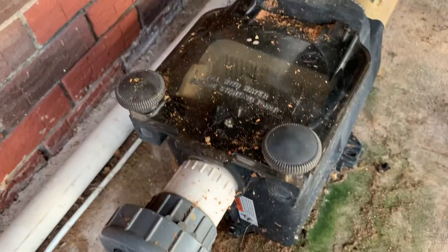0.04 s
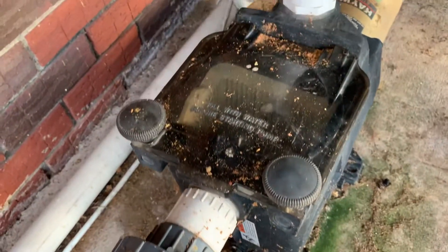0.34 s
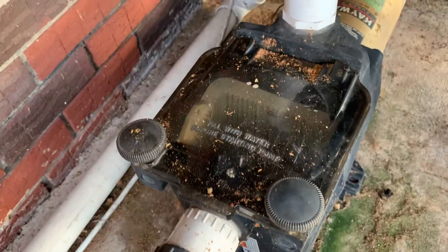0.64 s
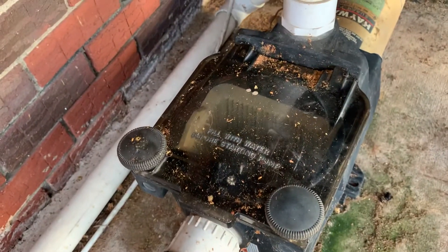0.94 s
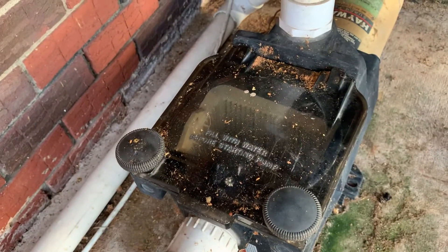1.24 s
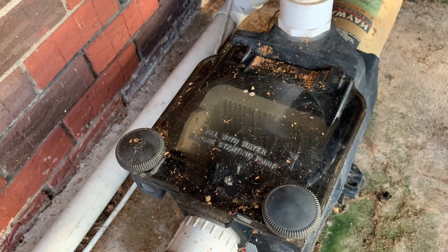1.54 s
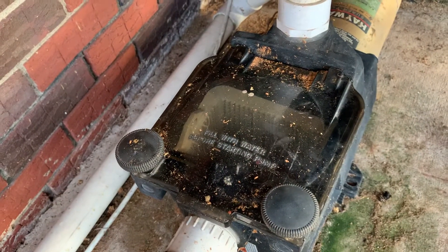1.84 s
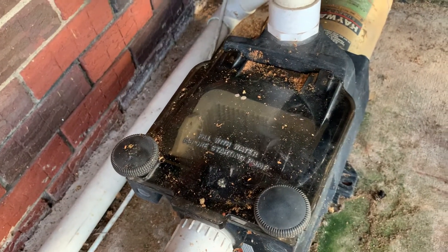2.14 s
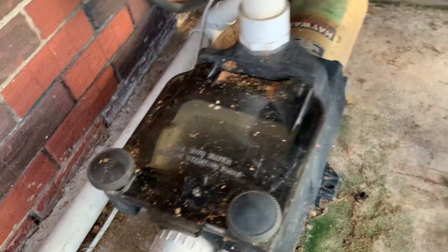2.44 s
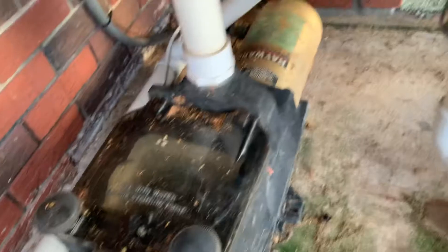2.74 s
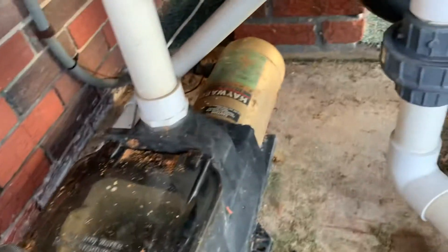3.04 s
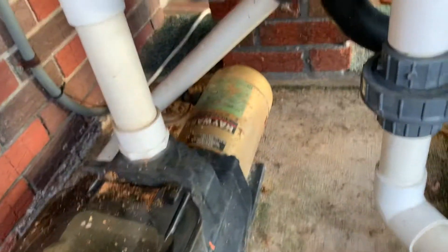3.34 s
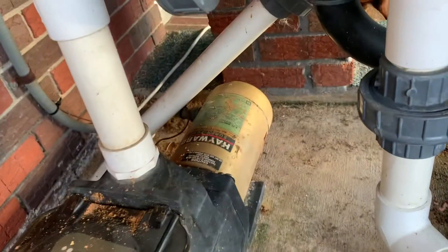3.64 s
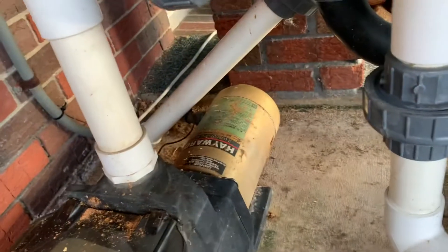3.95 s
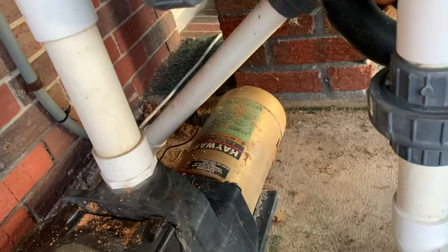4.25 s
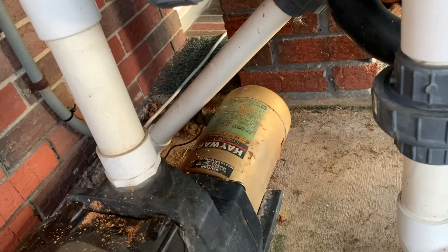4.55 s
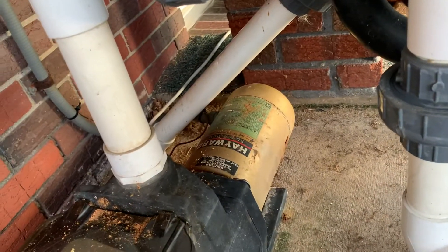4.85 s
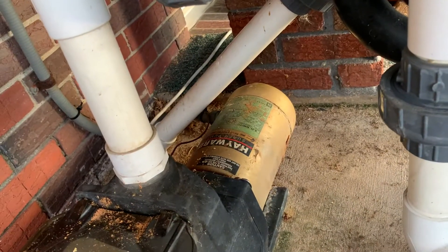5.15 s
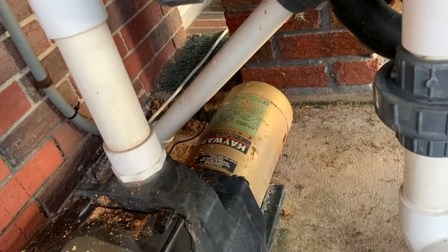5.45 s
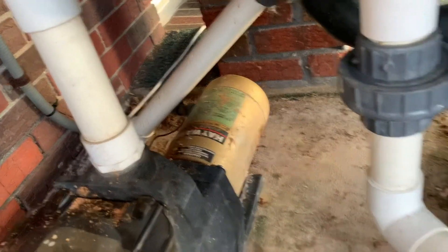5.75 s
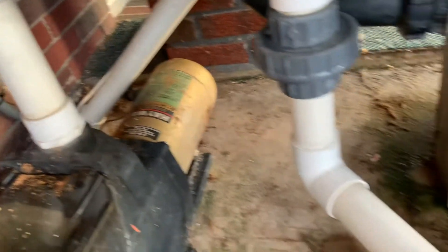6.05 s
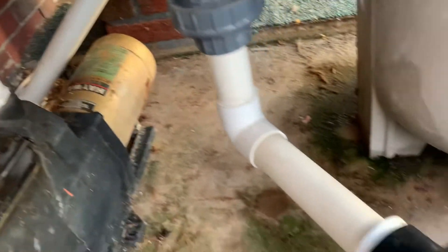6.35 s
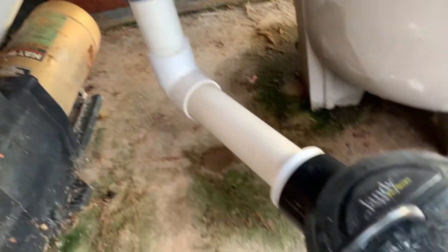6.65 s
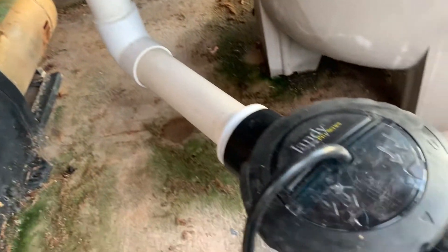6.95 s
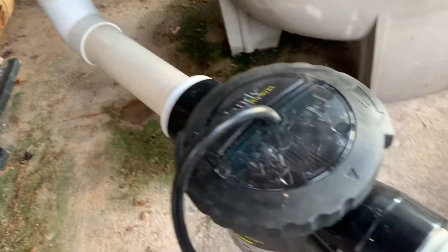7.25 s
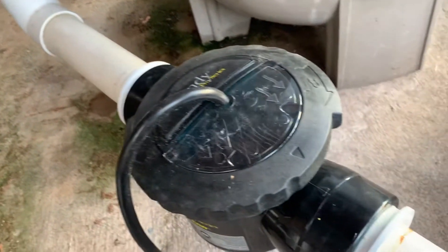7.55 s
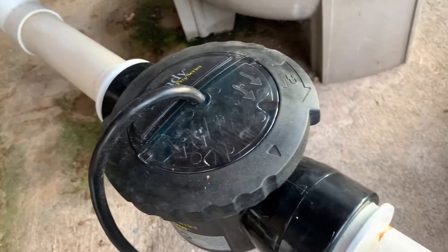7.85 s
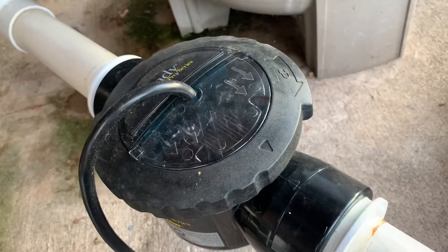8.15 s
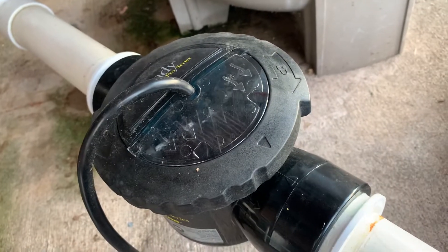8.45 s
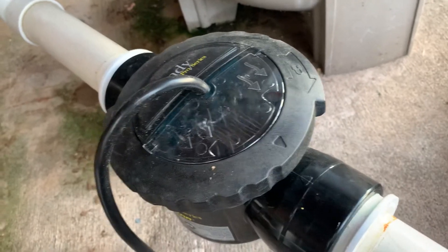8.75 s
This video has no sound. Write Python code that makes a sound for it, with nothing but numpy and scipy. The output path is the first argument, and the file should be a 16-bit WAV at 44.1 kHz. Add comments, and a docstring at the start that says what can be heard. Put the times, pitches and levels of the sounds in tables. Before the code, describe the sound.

A pool pump runs outdoors beside a brick wall for the whole nine seconds, heard from a close, moving microphone. Its worn bearing makes a loud whine: a rapidly fluttering mid-pitched drone with many higher whistling tones that slowly swell and fade. Under it lie a fine grinding rattle, a low electric hum pulsing about three times a second, a steady rush of cooling air and a high hiss of water in the pipes. From about 3.5 to 5.5 seconds, by the motor, the drone is strongest and the water hiss is a little brighter. Between 6 and 7 seconds the microphone moves on toward a valve, and the low hum and lower drone weaken. A higher, piercing tone then swells, peaking near 8 seconds, while rattle and hiss ease slightly. The pump is still running at the end.

```python
"""A worn ball bearing whines in a pool pump beside a brick wall.
A pitted ball knocks on the races, louder once per cage turn, giving harmonics with sidebands.
The microphone moves from strainer lid past motor to valve: the lowest sideband pair drones
throughout, higher tones swell and fade as it crosses their standing waves.
The bearing also rattles, mains hum beats against the shaft, cooling air and water rush."""
import sys
import numpy as np
from scipy import signal
from scipy.fft import rfft, irfft, next_fast_len
from scipy.io import wavfile

SR = 44100
rng = np.random.default_rng(int(sys.argv[2]) if len(sys.argv) > 2 else 0)


def log_audio(samples):
    """Write samples as a 16-bit WAV file to the path given in sys.argv[1]."""
    # one column per channel
    frames = np.atleast_2d(samples).T
    # limit to full scale, then quantise
    limited = np.clip(frames, -1, 1)
    pcm = np.round(limited * 32767).astype(np.int16)
    wavfile.write(sys.argv[1], SR, pcm)


N = 392490

BALL_HZ, CAGE_HZ, SHAFT_HZ, MAINS_HZ = 228.12, 23.15, 58.53, 60.0
CONTROL_STEP = 50
TIME_S = np.arange(N) / SR
CONTROL_S = np.arange(N // CONTROL_STEP + 2) * CONTROL_STEP / SR
FFT_SIZE = next_fast_len(N, True)
FREQS_HZ = np.maximum(np.arange(FFT_SIZE // 2 + 1) * SR / FFT_SIZE, 1)

# Microphone path: time_s, position_m
MIC_PATH = [(0, 0.062), (2.3, 0.034), (3.5, 0.337), (5.5, 0.24), (6.2, 0.616), (7.3, 0.88), (8.9, 0.9)]
# Relation of the two microphone ports: freq_hz, coherence, left_lead_rad
MIC_PORTS = [(100, 1, 0.8), (298, 0.82, -0.5), (520, 0.33, 1.47), (1260, 0.19, 0.5), (4970, 0.13, -1),
             (7160, 1, -3), (8540, 0.8, -5.5), (10340, 0.92, -7.5), (11380, 1, -10.5), (13760, 1, -12)]
# Source gains along the path: time_s, air_db, bearing_db, water_db
NEARNESS = [(0, -3.5, 1.5, 0), (2.4, -6, -0.5, 2), (3.5, -8.5, -0.6, 4), (5.3, -8, 0.8, 4),
            (6.2, -5, -2.8, 2.5), (6.9, -4, -1.2, 2), (8.9, -6, -4, -1)]
# Cooling air spectrum: freq_hz, density_db
AIR_SPECTRUM = [(25, -35), (45, -30), (62, 3), (90, -12), (150, -12), (270, 3), (350, -17), (450, 0.5),
                (580, -3), (700, -13.5), (900, -5), (1350, -14.5), (2200, -8.5), (5000, -28)]
# Water hiss spectrum: freq_hz, density_db
WATER_SPECTRUM = [(2000, -4), (5500, -3.5), (7000, -4), (8200, 1.5), (10500, 0.5), (11500, -2),
                  (12600, -6.5), (14000, -8.5), (15200, -22)]
# Motor hum along the path: time_s, magnetic_db, shaft_gain_db
HUM_LEVELS = [(0, -38.5, 2.5), (5.8, -38, 3), (7.1, -45.5, -2), (8.9, -45.5, -11)]
# Shaft and blade tones: shaft_order, level_db
SHAFT_ORDERS = [(2, -45), (5, -46)]
# Bearing rattle colour: freq_hz, gain_db
RATTLE_SPECTRUM = [(60, -57), (250, -3), (690, -4.5), (950, 1), (2000, 2.5), (2700, 1.5), (3200, -7),
                   (3800, -0.5), (4450, 0.5), (5000, -5.5), (6100, -1), (8200, -3.5), (10500, -7.5),
                   (13800, -21), (15000, -36)]
# Lower sideband of ball harmonic 2: time_s, level_db, left_over_right_db
LOWER_DRONE = [(0, -24, -4), (1.9, -23, -2.3), (2.8, -27, -5.5), (4, -20.5, -12), (5.5, -21.0, -10.5),
               (6.8, -26.5, -0.5), (8.9, -32.5, -3)]
# Upper sideband of ball harmonic 2: time_s, level_db, left_over_right_db
UPPER_DRONE = [(0, -31, 1), (2.6, -45.5, -5), (3.8, -31.5, -3), (5.7, -33, -10), (6.6, -23.5, -0.5),
               (8.1, -32, 8), (8.9, -29.5, 1)]
# Tones that carry outside any loud lobe: ball_harmonic, cage_sideband, base_db
CARRYING_TONES = [(2, 0, -48.5), (3, -1, -50), (3, 0, -57), (5, 0, -47.5), (6, 1, -43), (11, 1, -49),
                  (12, -1, -46.5), (15, -1, -48.5), (15, 0, -49), (19, 0, -47)]
# Loud standing-wave lobes, crossed node to node: # middle_s, length_s, ball_harmonic, cage_sideband (steps of
# the cage rate), peak_db, left_over_right_db, left_lead_rad # The two 6.42 s rows, 5 steps above harmonics 17
# and 18, stand for the shaft's second-order sidebands near 4 kHz.
LOBES = [(3.99, 3.32, 3, 0, -29, 3.5, 1.3), (6.74, 3.35, 3, 0, -29, 3.5, 1.88),
         (8.83, 1.3, 3, 0, -32.5, 6, 2.5), (7.1, 3.4, 3, 1, -41, 3, 2.5), (7.6, 5.1, 4, 0, -42, 7, 0.75),
         (1.86, 4, 5, -1, -36, 1, -1), (3.17, 2.06, 5, -1, -38, 2, -1.5), (7.9, 2.9, 5, -1, -36, 0.5, 2),
         (5.38, 2.3, 5, 1, -37.5, 6, 0.6), (8.5, 2.7, 5, 1, -39.5, 9, 2.5),
         (3.48, 1.3, 6, -2, -38, -2, 0.6), (0.79, 3, 6, -1, -31, -0.5, 3),
         (2.43, 1.15, 6, -1, -28.5, 4.5, 3), (3.52, 1.05, 6, -1, -27.5, -0.5, 0.3),
         (4.97, 2.15, 6, -1, -24.5, -0.5, 3.5), (5.82, 0.63, 6, -1, -33, -3, 4.6),
         (6.73, 1.25, 6, -1, -29.5, 2.5, 4), (7.82, 2.73, 6, -1, -19, -2, 3.5),
         (0.071, 3.54, 6, 1, -24, 4.5, 0), (2.12, 2.23, 6, 1, -30.5, 1, 0.8), (3.32, .7, 6, 1, -34, 0, 1.5),
         (5.88, 0.63, 6, 1, -35.5, -1, -1.5), (7.1, 1.5, 6, 1, -31.5, 2, 0.2),
         (8.16, 0.99, 6, 1, -38, -1, 1.8), (8.85, 0.48, 6, 1, -31.5, 3, 2), (0.4, 1.5, 7, -1, -37, 0, -2),
         (1.6, 2.5, 7, 1, -33.5, -4, -1.2), (3.85, 3.2, 7, 1, -36.5, 0.5, 0.8),
         (6.52, 0.92, 7, 1, -36, 0, 0.8), (3.93, 2.4, 9, -1, -40, 6, .5), (6.8, 0.85, 9, -1, -40.5, 3, 1),
         (7.36, 0.93, 9, 1, -39.5, 0, 0), (4.1, 0.78, 10, 1, -40, 4, 0.2), (5.24, 1.4, 10, 1, -38, 2, 0.2),
         (2.47, 1.43, 12, -1, -37, 3, 0.5), (4.36, 1.9, 12, -1, -35.5, -1, -2.5),
         (5.58, 1.4, 12, -1, -33, -1.5, -1.7), (8.07, 3.2, 12, -1, -42.5, 5, 0.5),
         (3.3, 1.5, 12, 1, -35, -1, 1.44), (6.49, 0.82, 12, 1, -32, 6, -1.5), (3.5, 2.4, 13, 1, -39, -3, 3),
         (6.05, 2.2, 13, 1, -38, 1, 3), (8.01, 3, 13, 1, -38, 3, 1.75), (3.83, 1.7, 15, 0, -39.5, -1, 2),
         (5.23, 1.4, 15, 0, -37, -4, 4), (0.65, 1.5, 16, 0, -38.5, 5, -3),
         (3.75, 1.7, 16, 0, -34.5, -3, 1.8), (5.16, 1.65, 16, 0, -34.5, -4.5, 0.7),
         (5.9, 0.38, 16, 0, -38, -3, 1.5), (6.27, 0.38, 16, 0, -36, -3, 2.5),
         (6.83, 0.74, 16, 0, -33, 2, -2), (8.12, 1.06, 16, 0, -38, 2, 1), (1.1, 1.1, 17, -1, -43, -1, 0),
         (7.95, 0.84, 17, -0.5, -42.5, -1, 0.5), (0.25, 1.2, 17, 0, -36.5, -1, 0.5),
         (1.14, 0.81, 17, 0, -39, -2, 0), (2.03, 0.83, 17, 0, -37.5, -2, 0.5),
         (3.25, 1.1, 17, 0, -34, -4, -2.3), (4.3, 1.9, 17, 0, -40, -2, 3),
         (6.24, 0.4, 17, 0, -32.5, 1, 0.5), (7.02, 1.4, 17, 0, -34, -0.5, -1.6),
         (8.88, 0.7, 17, 0, -35.5, -2, -2), (0.091, 0.76, 17, 1, -35.5, -4, 0.5),
         (5, 1.4, 17, 1, -43, -2, 0.5), (6.42, 0.36, 17, 5, -39, 0, -0.5), (6.42, 0.39, 18, 5, -41, -2, 2),
         (6.3, 0.45, 18, 0, -37, -1, 2.5), (1.36, 1.2, 19, -1, -43.5, 1, -0.5),
         (0.87, 0.78, 19, 0, -38.5, -2, 1.4), (3.27, 0.98, 19, 0, -41, -3, 0.5),
         (4.26, 0.9, 19, 0, -42, -2, 0), (8.2, 1.4, 19, 0, -41, -3, 0),
         (0.38, 0.48, 20, 0, -38.5, -8, -0.2), (4.3, 1.3, 20, 0, -40.5, -5, 0.7),
         (7.3, 1, 20, 0, -42, -5, 1.3), (8.7, 0.6, 20, 0, -40.5, -4, 1.2),
         (4.94, 2.4, 21, 0, -41.5, -11, 0.5), (2.07, 1.1, 25, 1, -40, -13, -2.5),
         (4.2, 1, 35, -1.5, -39, 0, 1)]


def from_db(db):
    return 10 ** (np.asarray(db) / 20)


def unit_rms(x):
    return x / np.sqrt(np.mean(np.abs(x) ** 2) + 1e-20)


def over_time(rows, times_s):
    """Table columns, interpolated in time."""
    knots_s, *columns = np.transpose(rows)
    return [np.interp(times_s, knots_s, column) for column in columns]


def over_freq(rows):
    """Table columns, interpolated in log frequency."""
    knots_hz, *columns = np.transpose(rows)
    return [np.interp(np.log(FREQS_HZ), np.log(knots_hz), column) for column in columns]


def drift(rate_hz):
    """Low-passed noise at control rate; rms 1."""
    pole = np.exp(-2 * np.pi * rate_hz * CONTROL_STEP / SR)
    count = len(CONTROL_S)
    noise = rng.standard_normal(2 * count)
    return unit_rms(signal.lfilter([1], [1, -2 * pole, pole * pole], noise)[count:])


def phasor(hz, start_s=0):
    """Steady rotation at control rate."""
    return np.exp(2j * np.pi * hz * (CONTROL_S - start_s))


def audio_rate(control):
    return np.interp(TIME_S, CONTROL_S, control)


def tone_at_ports(level_db, pan_db, lead_rad):
    """Complex amplitude of a tone at the left and right port."""
    ratio = from_db(pan_db)
    right = np.sqrt(2 / (1 + ratio ** 2))
    ports = [ratio * right * np.exp(.5j * lead_rad), right * np.exp(-.5j * lead_rad)]
    return from_db(level_db) * np.vstack(ports)


def noise_at_ports(pair, spectrum):
    """Two signals, coloured and mixed as the ports pick them up; rms 1."""
    coherence, lead_rad = over_freq(MIC_PORTS)
    coherence = np.clip(coherence, 0, 1)
    left, other = rfft(pair, FFT_SIZE)
    right = (coherence * left + np.sqrt(1 - coherence ** 2) * other) * np.exp(-1j * lead_rad)
    colour = from_db(over_freq(spectrum)[0])
    return unit_rms(irfft(np.array([left, right]) * colour, FFT_SIZE)[:, :N])


def housing_ring(pair, position_m, t60_s, direct_db, zones):
    """Housing, wall and slab ring briefly; peaks and notches change with position."""
    age_s = TIME_S[:SR // 20]
    place = audio_rate(position_m)
    place = place / place.max() * (zones - 1)
    out = from_db(direct_db) * pair
    for zone in range(zones):
        ring = rng.standard_normal((2, len(age_s))) * from_db(-60 * age_s / t60_s)
        ring /= np.linalg.norm(ring, axis=1, keepdims=True)
        share = np.sqrt(np.maximum(1 - np.abs(place - zone), 0))
        out += signal.oaconvolve(pair * share, ring, axes=1)[:, :N]
    return out


def cooling_air():
    """Broadband rush of the motor's cooling air; rms 1."""
    return noise_at_ports(rng.standard_normal((2, N)), AIR_SPECTRUM)


def water_hiss(position_m):
    """Water squeezes through impeller and pipes, heard through the ringing housing; rms 1."""
    flow = rng.standard_normal((2, N))
    ringing = housing_ring(flow, position_m, t60_s=0.051, direct_db=1.0, zones=6)
    return noise_at_ports(ringing, WATER_SPECTRUM)


def motor_hum(in_phase_s=0.294, overtone_db=-50.5, unbalance_db=-49):
    """The rotor slips behind the field, so shaft order 2 beats with the hum at about 3 Hz."""
    magnetic_db, shaft_gain_db = over_time(HUM_LEVELS, TIME_S)
    rad_per_hz = 2 * np.pi * (TIME_S - in_phase_s)
    magnetic = from_db(magnetic_db) * np.cos(2 * MAINS_HZ * rad_per_hz)
    magnetic += from_db(overtone_db) * np.cos(4 * MAINS_HZ * rad_per_hz)
    shaft = sum(from_db(db) * np.cos(order * SHAFT_HZ * rad_per_hz) for order, db in SHAFT_ORDERS)
    unbalance = from_db(unbalance_db) * np.cos(SHAFT_HZ * rad_per_hz)
    balance = from_db([[-0.7], [0.7]])
    return np.sqrt(2) * (magnetic + unbalance + from_db(shaft_gain_db) * shaft) * balance


def race_roughness(skid_s, points=700):
    """The same race bumps pass on every shaft turn: a fine comb of lines; rms 1."""
    turn = SHAFT_HZ * (TIME_S + skid_s) % 1
    return unit_rms(np.interp(turn, np.linspace(0, 1, points), rng.standard_normal(points)))


def ball_knocks(skid_s, cage_depth=0.4, shaft_depth=0.38, spread_db=1.0):
    """Impulses of the pitted ball, loaded by cage and shaft; rms 1."""
    turns = BALL_HZ * (TIME_S + skid_s)
    hits = np.flatnonzero(np.diff(np.floor(turns)) > 0)
    late_samples = (np.ceil(turns[hits]) - turns[hits]) * SR / BALL_HZ
    cage_load = 1 + cage_depth * np.cos(2 * np.pi * CAGE_HZ * TIME_S[hits])
    shaft_load = 1 + shaft_depth * np.cos(2 * np.pi * SHAFT_HZ * TIME_S[hits])
    force = cage_load * shaft_load * from_db(-spread_db * rng.standard_normal(len(hits)))
    knocks = np.zeros(N)
    knocks[hits], knocks[hits + 1] = force * (1 - late_samples), force * late_samples
    return unit_rms(knocks)


def bearing_rattle(skid_s, position_m, race_db=2.5, grind_db=6.5):
    """Knocks, race bumps and grinding ring the housing."""
    knocks = ball_knocks(skid_s)
    bumps = from_db(race_db) * race_roughness(skid_s)
    grind = from_db(grind_db) * rng.standard_normal((2, N))
    ringing = housing_ring(knocks + bumps + grind, position_m, t60_s=0.031, direct_db=-6.0, zones=12)
    balance = from_db([[-0.8], [0.8]])
    return balance * noise_at_ports(ringing, RATTLE_SPECTRUM)


def standing_wave(hz, position_m, direct=0.25, port_gap_m=0.1335, count=6, sound_m_per_s=343):
    """Direct sound plus reflections off wall, slab and pipes, summed by position; rms 1."""
    along, across, half_turns = rng.uniform(-1.004, 1, (3, count, 1, 1))
    path_m = along * position_m + across * port_gap_m * np.array([[0], [1]])
    rays = np.exp(1j * (2 * np.pi * hz * path_m / sound_m_per_s + np.pi * half_turns))
    return unit_rms(direct + rays.sum(0) / np.sqrt(count))


def swells(harmonic, sideband):
    """One tone's half-cosine lobes, and how deep the microphone is inside one (0-1)."""
    envelope, inside = 0, 0
    for middle_s, length_s, lobe_harmonic, lobe_sideband, peak_db, pan_db, lead_rad in LOBES:
        if (round(lobe_harmonic), round(lobe_sideband)) == (harmonic, sideband):
            lobe = np.cos(np.pi * np.clip((CONTROL_S - middle_s) / length_s, -.5, .5))
            envelope = envelope + lobe * tone_at_ports(peak_db, pan_db, lead_rad)
            inside = np.maximum(inside, lobe)
    return envelope, inside


def whistles(position_m, floor_db=-52, shade_per_harmonic=0.041, flutter=0.04, throb=0.005):
    """Tones wander faintly between swells; higher ones flutter and throb more with the cage."""
    bearing_db = over_time(NEARNESS, CONTROL_S)[1]
    base_db = {(round(row[2]), round(row[3])): floor_db for row in LOBES}
    base_db.update({(harmonic, sideband): db for harmonic, sideband, db in CARRYING_TONES})
    lines = []
    for (harmonic, sideband), db in sorted(base_db.items()):
        loud, inside = swells(harmonic, sideband)
        shade_db = shade_per_harmonic * harmonic * bearing_db  # highs fade faster with distance
        faint = from_db(db + shade_db) * standing_wave(harmonic * BALL_HZ, position_m)
        waver = 1 + flutter * np.sqrt(harmonic) * drift(rate_hz=17)
        waver += throb * harmonic * phasor(CAGE_HZ, start_s=rng.random()).real
        lines.append((harmonic, (loud + (1 - inside) * faint) * waver * phasor(sideband * CAGE_HZ)))
    return lines


def drone(position_m, flutter=0.062, lead_rad_per_m=3.84):
    """The two sidebands of harmonic 2 beat together; (harmonic, envelope) for each."""
    lower_lead_rad = -2.01 + lead_rad_per_m * position_m
    lower = tone_at_ports(*over_time(LOWER_DRONE, CONTROL_S), lower_lead_rad) * phasor(-CAGE_HZ)
    upper = tone_at_ports(*over_time(UPPER_DRONE, CONTROL_S), lead_rad=1.54) * phasor(CAGE_HZ)
    return [(2, line * (1 + flutter * drift(rate_hz=31))) for line in (lower, upper)]


def bearing_whine(skid_s, position_m, shaft_depth=0.0056, mains_depth=0.069):
    """Knock harmonics with cage sidebands, shaken by the shaft and the magnetic pull."""
    lines = drone(position_m) + whistles(position_m)
    shake = 1 + shaft_depth * phasor(SHAFT_HZ).real + mains_depth * phasor(2 * MAINS_HZ).real
    out = np.zeros((2, N))
    for order in sorted({harmonic for harmonic, line in lines}):
        envelope = shake * sum(line for harmonic, line in lines if harmonic == order)
        carrier = np.exp(2j * np.pi * (order * BALL_HZ * (TIME_S + skid_s) + rng.random()))
        out += np.sqrt(2) * np.array([(audio_rate(port) * carrier).real for port in envelope])
    return out


def scene():
    """Air, water, hum and bearing along the microphone path."""
    position_m, = over_time(MIC_PATH, CONTROL_S)
    air_db, bearing_db, water_db = over_time(NEARNESS, TIME_S)
    # the ball skids, so knocks come early or late
    skid_s = audio_rate(3e-5 * drift(rate_hz=1.5) + 4e-6 * drift(rate_hz=25))
    whine = bearing_whine(skid_s, position_m)
    rattle = from_db(bearing_db - 30) * bearing_rattle(skid_s, position_m)
    air = from_db(air_db - 32) * cooling_air()
    water = from_db(water_db - 34.5) * water_hiss(position_m)
    return air + water + motor_hum() + rattle + whine


def record(dry, low_cut_hz=24, high_cut_hz=15400):
    """The microphone drops the deepest bass; the top is cut steeply."""
    highpass = signal.butter(2, low_cut_hz, "high", fs=SR, output="sos")
    lowpass = signal.ellip(10, .1, 90, high_cut_hz, fs=SR, output="sos")
    return signal.sosfilt(lowpass, signal.sosfilt(highpass, dry))


dry = scene()
out = record(dry)
log_audio(out)
```